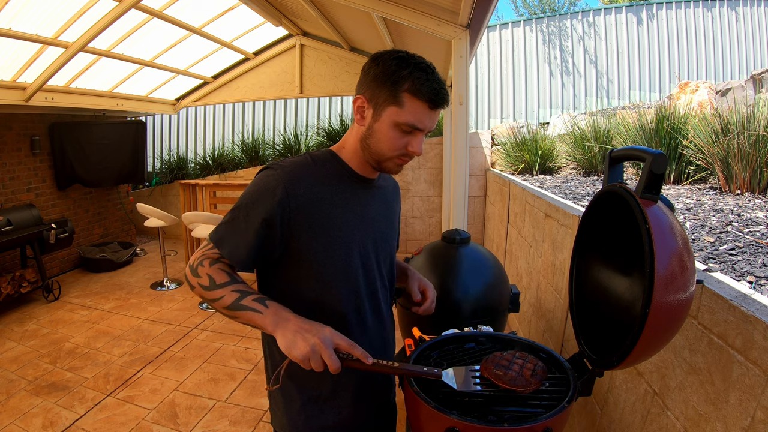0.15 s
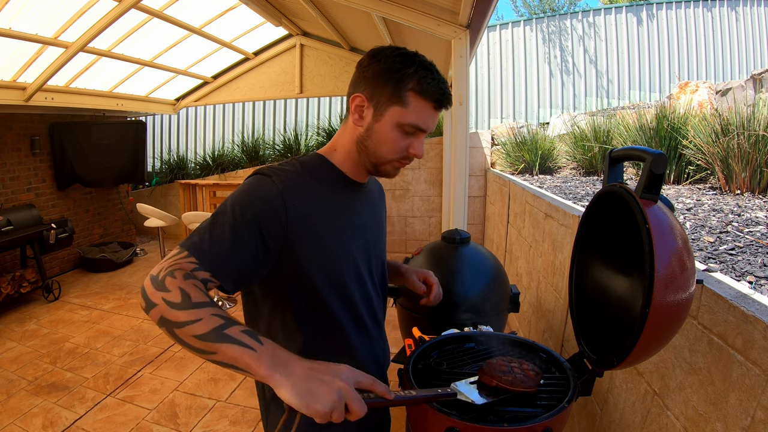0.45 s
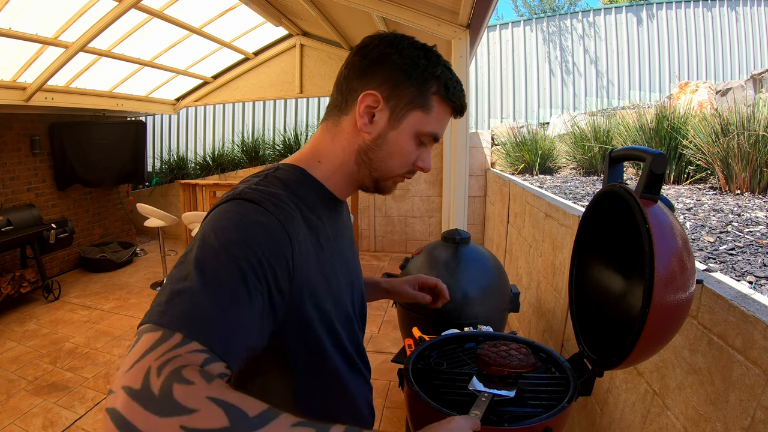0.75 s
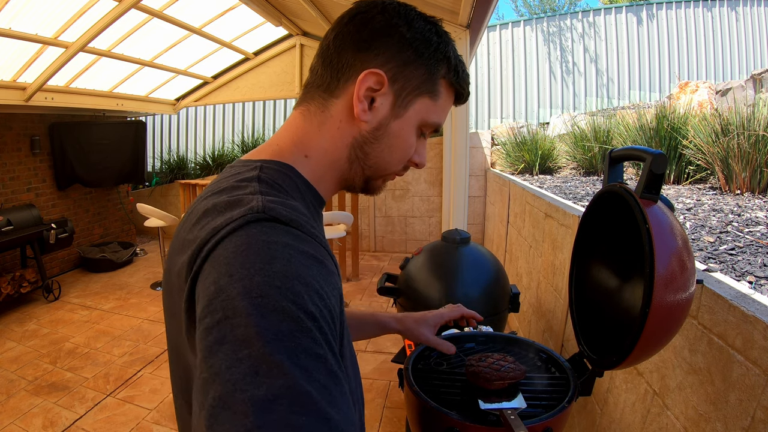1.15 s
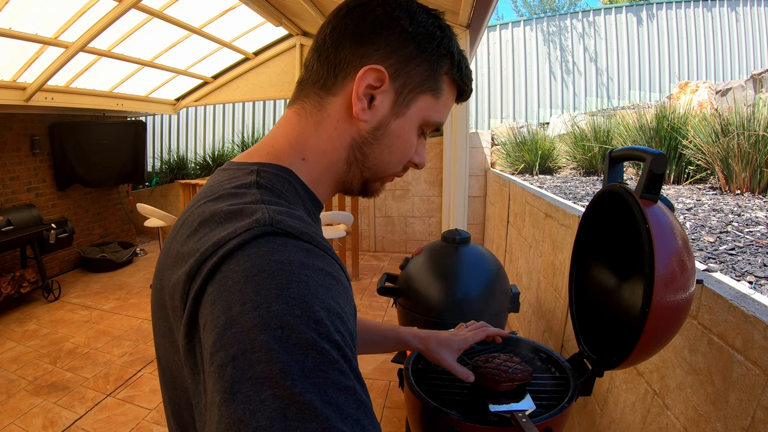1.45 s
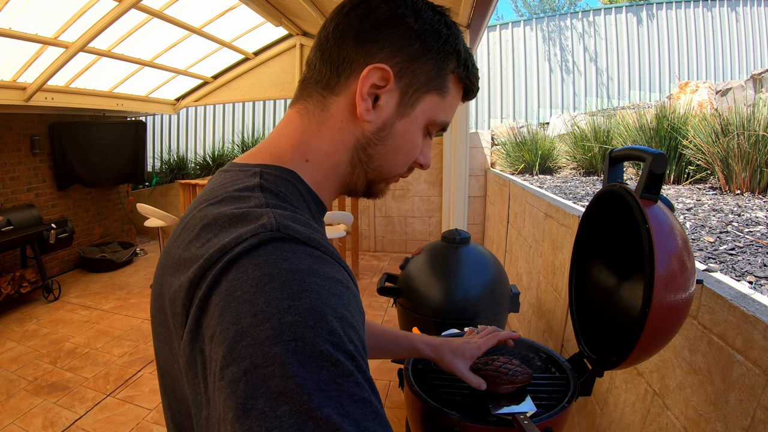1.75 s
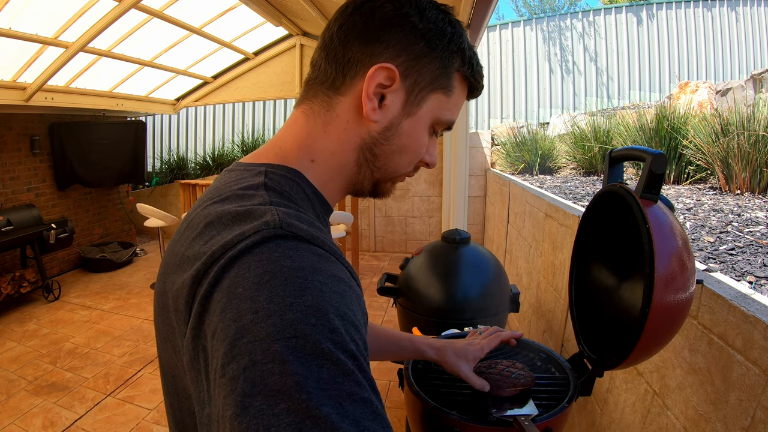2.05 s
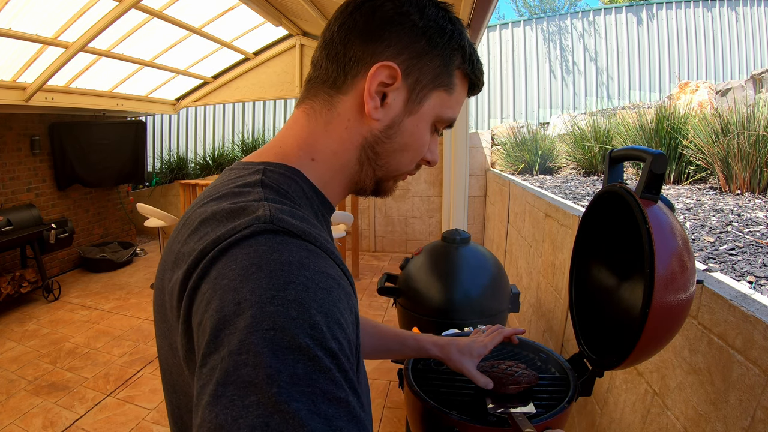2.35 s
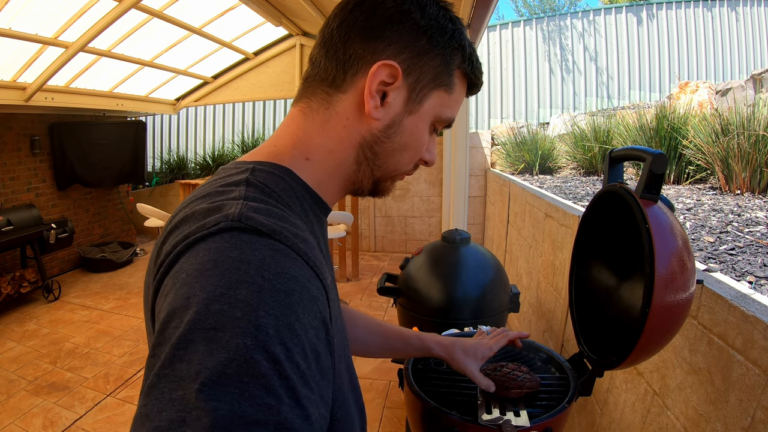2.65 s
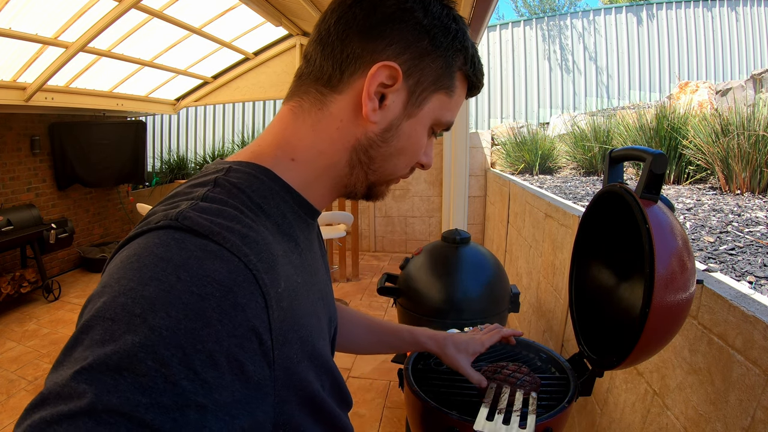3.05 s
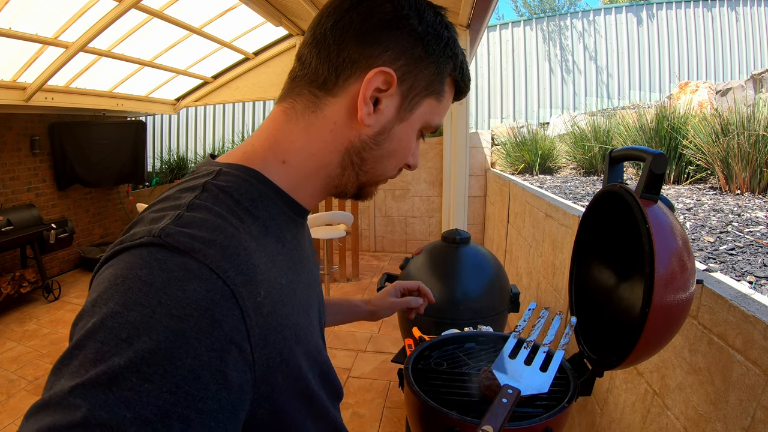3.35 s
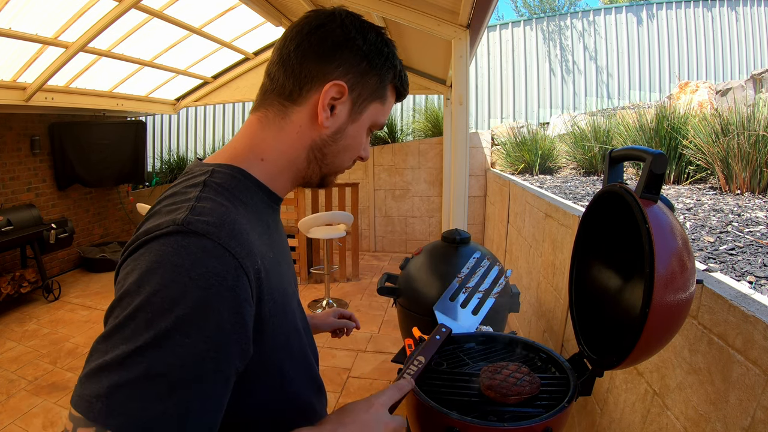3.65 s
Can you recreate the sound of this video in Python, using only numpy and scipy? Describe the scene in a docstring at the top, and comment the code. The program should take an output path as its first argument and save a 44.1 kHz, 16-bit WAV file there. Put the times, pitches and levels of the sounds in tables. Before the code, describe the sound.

A steak sizzles and crackles close up on an outdoor grill, with small fat pops; it quietens, a steel spatula scrapes and clinks on the grate, then the sizzle surges, dense and loud. Close stereo microphones.

```python
"""Under a patio roof, a steak sizzles on a kettle grill: a crackle of thousands of tiny bubble clicks.
Pockets of juice sputter (runs of ringing clicks), steam sings (narrow sliding hisses) and fat pops.
The cook shuffles about (soft noise scuffs and knocks) and works a steel spatula under the meat;
it scrapes the grate (tiny slips that ring steel tones). The sizzle surges, in a second and denser
layer of bubbles, as the wet side lands on hot metal. Low outdoor noise lies behind it all."""
import sys
import numpy as np
from scipy import signal
from scipy.fft import rfft, irfft, next_fast_len
from scipy.io import wavfile

SR = 44100
rng = np.random.default_rng(int(sys.argv[2]) if len(sys.argv) > 2 else 0)


def master_out(mix):
    """Clip the mix to full scale and print it as 16-bit PCM to the path in sys.argv[1]."""
    frames = np.transpose(np.atleast_2d(mix))
    ceiling = np.clip(frames, -1, 1)
    pcm = np.round(ceiling * 32767).astype(np.int16)
    wavfile.write(sys.argv[1], SR, pcm)


N = 167580
SIZE = next_fast_len(N + SR // 8, True)  # padded length for filtering
T, HZ = np.arange(N) / SR, np.fft.rfftfreq(SIZE, 1 / SR)

# outdoor background, relative loudness by pitch: pitch_hz, level_db
AIR_COLOUR = [(20, -17), (40, -11), (70, -14), (105, -27), (140, -0.5), (190, -0.5), (290, -4.5),
              (420, -18.5), (750, -7), (1500, -9.5), (5000, -26.5), (15000, -49)]
AIR_DB = -71
# a puff of air on the microphone: start_s, length_s, level_db
AIR_PUFF = (1.455, .09, -61)

# dull knocks and rumbles of handling: start_s, length_s, level_db, pitch_hz
HANDLING_KNOCKS = [(0.625, 0.061, -60.5, 277), (0.783, 0.046, -67, 193), (1.433, 0.076, -59, 510),
                   (1.442, 0.054, -63.5, 320), (1.51, 0.16, -66, 262), (2.244, 0.25, -70.5, 207),
                   (2.438, 0.1, -70.5, 414), (2.716, 0.052, -64.5, 290), (2.944, 0.047, -57.5, 250),
                   (3.077, 0.14, -56, 252), (3.278, 0.16, -62, 280), (3.443, 0.25, -67, 237)]
KNOCK_WIDTH = 0.4  # share of its pitch

# soft scuffs and bumps as the cook moves: start_s, length_s, level_db, thump_level_db
COOK_SCUFFS = [(0.594, 0.082, -52.5, -60.5), (1.414, 0.09, -55.5, -63), (2.173, 0.086, -54, -64),
               (2.525, 0.052, -57.5, -77), (2.896, 0.13, -49, -60), (3.10, 0.11, -67, -62)]
SCUFF_RISE_S = .012
# relative loudness of the gritty rub: pitch_hz, level_db
GRIT_COLOUR = [(100, -31), (250, -1.5), (400, -6), (540, -4.5), (800, 0.5), (1100, -0.5), (1900, 1.5),
               (5000, -41), (12000, -67)]
# relative loudness of the dull thump: pitch_hz, level_db
DULL_COLOUR = [(30, -20), (90, -54), (140, 1), (230, 4), (330, -7), (500, -6.5), (2000, -64)]

# the blade nudges the grate: start_s, length_s, level_db
GRATE_NUDGES = [(2.549, 0.023, -58), (2.586, 0.016, -64)]
# tones at which the grate rings: pitch_hz, level_db, time_to_fade_60_db_s
GRATE_TONES = [(394, -3, 0.17), (730, -16, .09), (850, -1, .09), (1038, 2.5, 0.053), (1184, -4, 0.042)]

# spatula scraping the grate: start_s, length_s, level_db, rasp_pitch_hz
BLADE_SCRAPES = [(2.535, 0.0097, -43, 4330), (2.540, 0.0042, -43, 7000), (2.606, 0.031, -48, 6440),
                 (2.622, 0.025, -60, 3340), (2.707, 0.07, -49.5, 2100), (2.817, 0.026, -47, 4550),
                 (2.897, 0.013, -25.5, 6130)]
RASP_OCTAVES, RASP_DB = 0.53, 0.5  # spread in pitch; level against the ring
# sharp ticks as the blade catches on a bar: start_s, level_db
BLADE_TICKS = [(2.6192, -30), (2.6305, -44), (2.644, -38)]
TICK_DECAY_S, TICK_RING_DB = .0008, -30
# tones at which the steel rings: pitch_hz, level_db, time_to_fade_60_db_s
STEEL_TONES = [(2100, -21, .05), (2420, 3.5, 0.058), (3200, 9, 0.068), (4030, -28, 0.028),
               (4700, -9, 0.026), (5240, -9, 0.023), (6490, -4, .035), (6820, 6.5, 0.023),
               (7200, -5, 0.051), (9850, 1, .03)]

# single pops of fat: start_s, level_db, pitch_hz
FAT_POPS = [(0.344, -28, 5400), (0.875, -24, 3960), (1.951, -31, 3760), (1.992, -34, 3760),
            (2.020, -29.5, 5540), (2.421, -37, 4020)]
POP_DECAY_S, POP_GRIT, POP_ROOM_DB = 0.00067, 0.17, -5  # grit is a share of the tone

# narrow, singing hisses of escaping steam: start_s, length_s, level_db, first_pitch_hz, last_pitch_hz
STEAM_JETS = [(0.117, 0.088, -48.5, 5100, 4900), (0.446, 0.078, -49.5, 2770, 2580),
              (0.552, 0.11, -51, 2210, 2070), (0.708, 0.18, -48, 5360, 5260),
              (1.16, 0.21, -50.5, 6600, 6870), (1.945, 0.095, -48, 3894, 3770),
              (2.091, 0.3, -59, 3740, 3790), (2.33, 0.15, -62.5, 3840, 3890),
              (2.542, 0.023, -43.5, 3034, 3100), (2.578, 0.129, -53.5, 3100, 3020),
              (2.683, 0.1, -57, 2390, 2400), (2.709, 0.105, -56.5, 3080, 3050),
              (2.823, 0.032, -43.5, 4500, 4430), (3.412, 0.026, -42, 2257, 2280),
              (3.6, 0.03, -37, 3340, 3340), (3.646, 0.038, -38, 2810, 2700)]
JET_WIDTH_HZ = 270

# pockets of juice that sputter: start_s, length_s, level_db, pitch_hz
JUICE_SPUTTERS = [(0.037, 0.056, -41, 3900), (0.067, 0.16, -47.5, 4550), (0.793, 0.15, -46, 3900),
                  (0.865, 0.067, -40.5, 3820), (1.013, .13, -50.5, 3160), (1.075, 0.11, -46.5, 4500),
                  (1.505, 0.097, -48, 3450), (1.97, 0.13, -52, 3400), (3.145, 0.27, -38.5, 3720)]
SPUTTER_WIDTH, SPUTTERS_PER_S = 0.2, 1100  # width is a share of its pitch

CLUMP_WIDTH = 0.29  # one family of bubble sizes, share of its pitch
SPLIT_LOW_HZ, SPLIT_HIGH_HZ = 2585, 5560  # low mids | upper mids | treble
# resting sizzle over time: time_s, low_mids_db, upper_mids_db, treble_db
RESTING_LEVELS = [(0, -58, -47.5, -54), (.12, -57, -54, -46.5), (.22, -55.5, -50, -50.5),
                  (.5, -52.5, -52, -45), (.62, -56, -47.5, -47.5), (.76, -57.5, -47.5, -50),
                  (.9, -55.5, -46, -47), (1.17, -54.5, -47, -47), (1.5, -55, -47, -51.5),
                  (1.7, -58.5, -49.5, -52), (1.89, -63, -53.5, -60), (1.98, -55.5, -58, -60.5),
                  (2.17, -62, -55, -65.5), (2.35, -65.5, -59, -64), (2.52, -61.5, -59, -64.5),
                  (2.63, -56, -62, -59.5), (2.72, -60, -61, -66)]
# relative loudness of the resting sizzle: pitch_hz, level_db
RESTING_TONE = [(300, -16.5), (450, -25), (600, -21), (738, -13), (886, -27.5), (1060, -9.5), (1200, -15.5),
                (1520, -3), (1850, -8.5), (2120, -5.5), (2400, -8), (2900, -6), (3200, -1), (4000, 1),
                (4800, -4.5), (5400, -3), (6400, -6), (8500, -6.5), (10000, -13.5), (11200, -18),
                (13500, -21.5), (15500, -34)]
# the sizzle thins out as the underside dries, change of colour: pitch_hz, level_db
DRY_TONE = [(1000, -5), (1500, -3), (2100, 3.5), (3700, 3.5), (4500, -2), (5300, 2.5), (5900, -1),
            (6900, 3), (7800, 7), (8800, 10.5), (9800, 8), (11000, 6.5), (15000, 9)]
# when the dry colour takes over: time_s, share_0_to_1
DRYING_SHARE = [(1.7, 0), (2.0, 1)]
# surge of the turned steak over time: time_s, low_mids_db, upper_mids_db, treble_db
SURGE_LEVELS = [(2.6, -100, -100, -100), (2.78, -72, -61, -52.5), (2.84, -48, -47, -45.5),
                (2.89, -44.5, -40.5, -41), (2.93, -41.5, -34.5, -36.5), (3.03, -38, -32.5, -32.5),
                (3.19, -39.5, -32.5, -33), (3.4, -40, -33.5, -34), (3.63, -40.5, -36, -34),
                (3.8, -45.5, -37.5, -37.5)]
# relative loudness of the surge: pitch_hz, level_db
SURGE_TONE = [(190, -16), (330, -25), (448, -25.5), (618, -14), (760, -14), (881, -26.5), (1070, -9),
              (1230, -21), (1400, -13), (1600, -7.5), (1850, -12.5), (2220, -3), (2430, -7.5), (2780, -2.5),
              (3100, -6.5), (3650, -1.5), (4150, -6), (4750, -4), (5270, -6), (6290, -4), (6930, -6.5),
              (7900, -2.5), (9500, -11.5), (11200, -16), (13600, -21.5), (15500, -31)]

# how alike the two microphones hear: pitch_hz, likeness_0_to_1
MIC_LIKENESS = [(40, .3), (200, 0.99), (800, 0.37), (1350, 0.5), (2300, 0.82), (3700, 1), (6000, 0.34),
                (7500, 1), (10000, 0.053), (15000, 0.21)]
# how much louder the left is than the right: pitch_hz, left_minus_right_db
MIC_TILT = [(60, -11), (92, 10), (140, 0), (210, -0.5), (330, 0.5), (500, -2.5), (770, -0.5), (1170, -7),
            (1790, -2), (2740, -3.5), (4190, -2), (6410, 0), (9810, -3), (15000, -2)]
# how far the left leads the right: pitch_hz, lead_radians
MIC_LEAD = [(100, 1), (1000, 0.5), (1450, 1.7), (2100, 0.54), (3700, 0.5), (5400, -0.5), (7400, -1.5),
            (8400, -2), (9600, 0), (11500, 3), (15000, 1.5)]
# reflections: time to fade by 60 dB, level against the direct sound
BOWL_T60_S, BOWL_DB = .03, -13
PATIO_T60_S, PATIO_DB = .22, -14
EDGE_HZ = 15750  # top of the sound


def amp(db):
    """Turns decibels into a gain."""
    return 10 ** (np.asarray(db) / 20)


def unit(x):
    """Scales a sound to rms 1."""
    return x / np.sqrt(np.mean(x ** 2) + 1e-20)


def read(points):
    """Reads a table along log frequency, at every frequency bin."""
    f, value = np.transpose(points)
    return np.interp(np.log(HZ + 1), np.log(f + 1), value)


def shape(x, gain):
    """Filters a sound by one gain for each frequency bin."""
    return irfft(rfft(x, SIZE) * gain, SIZE)[..., :N]


def band(hz, width):
    """A resonance around one pitch; width is a share of that pitch."""
    return 1 / (1 + ((HZ - hz) / (hz * width / 2)) ** 2)


def noise_in(gain):
    """Plain noise coloured by a gain for each frequency bin, rms 1."""
    return unit(shape(rng.standard_normal(N), gain))


def drift(hz):
    """A random wander, mostly slower than hz, rms 1."""
    return noise_in(1 / (1 + (HZ / hz) ** 4))


def clicks(per_s, spread_db):
    """Clicks at random times; a positive spread makes a few stand out, a negative one makes a few faint."""
    size = amp(spread_db * np.minimum(rng.exponential(1, N), 4.5))
    return size * rng.choice([-1, 1], N) * (rng.random(N) < per_s / SR)


def burst(start, length, rise, release):
    """Rises in seconds, holds to half the length, then fades; release is a share of the length."""
    attack = np.clip((T - start) / rise, 0, 1)
    return attack * np.exp(-np.maximum(T - start - length / 2, 0) / (release * length))


def patchy(x, depth_db, width_hz, length_s):
    """The colour wanders at random, in patches across pitch and time; overall loudness stays."""
    f, t, z = signal.stft(x, SR, nperseg=1024, noverlap=768)
    across = np.fft.fftfreq(len(f), f[1])[:, None]
    along = np.fft.fftfreq(len(t), t[1])
    blur = np.exp(-(across * width_hz) ** 2 - (along * length_s) ** 2)
    field = unit(np.fft.ifft2(np.fft.fft2(rng.standard_normal(z.shape)) * blur).real)
    varied = signal.istft(z * amp(depth_db * field), SR, nperseg=1024, noverlap=768)[1][:N]
    return unit(varied) * np.std(x)


def air():
    """Low outdoor noise that swells at random, and one low puff of wind."""
    s, length, db = AIR_PUFF
    puff = amp(db) * burst(s, length, 0.0099, 0.18) * noise_in(band(34, 0.65))
    swell_db = 2 * drift(8)
    return puff + amp(AIR_DB + swell_db) * noise_in(amp(read(AIR_COLOUR)))


def knocks():
    """Low, short rumbles as the grill is handled: noise around one pitch each."""
    out = np.zeros(N)
    for s, length, db, hz in HANDLING_KNOCKS:
        out += amp(db) * burst(s, length, 0.0035, 0.45) * noise_in(band(hz, KNOCK_WIDTH))
    return out


def scuffs():
    """Gritty rubs of many clicks that swell unevenly and break up, each with a dull thump."""
    out = np.zeros(N)
    for s, length, db, thump_db in COOK_SCUFFS:
        grit = unit(shape(clicks(3500, spread_db=.6), amp(read(GRIT_COLOUR))))
        thump = noise_in(amp(read(DULL_COLOUR)))
        out += burst(s, length, SCUFF_RISE_S, 0.9) * (amp(db) * grit + amp(thump_db) * thump)
    uneven = out * amp(.7 * drift(90))
    return patchy(uneven, depth_db=3, width_hz=110, length_s=.035)


def grate():
    """The blade nudges the grate, which rattles in its seat: small clicks ring its tones."""
    t, out = T[:SR // 2], np.zeros(N)
    for s, length, db in GRATE_NUDGES:
        for hz, tone_db, t60 in GRATE_TONES:
            rattle = clicks(1500, spread_db=-3) * burst(s, length, .003, 0.59)
            tone = amp(-60 * t / t60) * np.sin(2 * np.pi * hz * t)
            ring = signal.fftconvolve(rattle, tone)[:N]
            # the root sets the level over the nudge, not over the whole scene
            out += amp(db + tone_db) * np.sqrt(length / T[-1]) * unit(ring)
    return out


def spatula():
    """Tiny slips of steel on steel ring fading tones; catches on a bar add short noise ticks."""
    t = T[:SR // 4]
    ring = sum(amp(db - 60 * t / t60) * np.sin(2 * np.pi * hz * t) for hz, db, t60 in STEEL_TONES)
    out = np.zeros(N)
    for s, length, db, hz in BLADE_SCRAPES:
        slips = clicks(2200, spread_db=2.0) * burst(s, length, 0.0027, 1.0)
        slips = shape(slips, np.exp(-.5 * (np.log2((HZ + 1) / hz) / RASP_OCTAVES) ** 2))
        ringing = unit(signal.fftconvolve(slips, ring)[:N])
        scrape = unit(ringing + amp(RASP_DB) * unit(slips))
        out += amp(db) * np.sqrt(length / T[-1]) * scrape
    for s, db in BLADE_TICKS:
        snap = rng.standard_normal(len(t)) * np.exp(-t / TICK_DECAY_S)
        tick = shape(snap, 2 * band(5600, .8) ** 2)[:len(t)]
        out[round(s * SR):][:len(t)] += amp(db) * (tick + amp(TICK_RING_DB) * ring)
    return out


def pops():
    """Single large bubbles: a few cycles of a gritty tone, with a short noisy ring of the bowl."""
    out, t = np.zeros((2, N)), T[:SR // 25]
    for s, db, hz in FAT_POPS:
        fade = amp(POP_ROOM_DB - 60 * t / BOWL_T60_S) * np.sqrt(POP_DECAY_S / BOWL_T60_S)
        bowl = rng.standard_normal((2, len(t))) * fade
        tone = np.sin(2 * np.pi * hz * t) + POP_GRIT * rng.standard_normal(len(t))
        at = round(s * SR)
        out[:, at:at + len(t)] += amp(db) * (np.exp(-t / POP_DECAY_S) * tone + bowl)
    # softens the lows and the highest treble
    return shape(out, 1 / (1 + (1800 / (HZ + 1)) ** 4) / (1 + (HZ / 9000) ** 4))


def jets():
    """Steam sings through small gaps; the pitch slides as the gap changes."""
    out = np.zeros(N)
    for s, length, db, first_hz, last_hz in STEAM_JETS:
        turns = np.cumsum(np.interp(T, [s, s + length], [first_hz, last_hz])) / SR
        # a random wobble widens the pure tone into a narrow hiss
        wobble = drift(JET_WIDTH_HZ / 2) + 1j * drift(JET_WIDTH_HZ / 2)
        hiss = (wobble * np.exp(2j * np.pi * turns)).real
        out += amp(db) * burst(s, length, 0.0085, 0.34) * hiss
    return out


def sputters():
    """Quick runs of bubbles ring one small pocket each."""
    out = np.zeros(N)
    for s, length, db, hz in JUICE_SPUTTERS:
        run = unit(shape(clicks(SPUTTERS_PER_S, spread_db=-1.8), band(hz, SPUTTER_WIDTH)))
        out += amp(db) * burst(s, length, 0.01, 0.57) * run
    return out


def sizzle(levels, colour, per_s, spread_db, snap_db, steam_db, patchy_db, flutter_db):
    """Bubbles of many sizes burst in clumps, with sharp snaps and a hiss of steam."""
    bubbles = np.zeros(N)
    for hz in np.geomspace(900, 15000, num=14):
        family = unit(shape(clicks(per_s * hz / SR, spread_db), band(hz, CLUMP_WIDTH)))
        bubbles += family * np.sqrt(hz) * amp(patchy_db * drift(10.4))
    snaps = amp(snap_db) * unit(clicks(per_s, spread_db))
    steam = amp(steam_db) * rng.standard_normal(N)
    fizz = (unit(bubbles) + snaps + steam) * amp(flutter_db * drift(30))
    fizz = shape(fizz, amp(read(colour)) / (1 + (280 / (HZ + 1)) ** 4))
    # three bands, each following its own level over time
    low = 1 / (1 + (HZ / SPLIT_LOW_HZ) ** 8)
    high = 1 - 1 / (1 + (HZ / SPLIT_HIGH_HZ) ** 8)
    s, *curves = np.transpose(levels)
    parts = zip([low, 1 - low - high, high], curves)
    return sum(unit(shape(fizz, part)) * amp(np.interp(T, s, db)) for part, db in parts)


def drying(x):
    """As the underside dries, the hiss blends from full to thin."""
    share = np.interp(T, *np.transpose(DRYING_SHARE))
    return (1 - share) * x + share * shape(x, amp(read(DRY_TONE)))


def resting():
    """The crackle of bubbles under the steak lying on the grate."""
    fizz = amp(0.5) * sizzle(RESTING_LEVELS, RESTING_TONE, per_s=6000, spread_db=2.0, snap_db=-1.0,
                             steam_db=-2.0, patchy_db=2.3, flutter_db=0.68)
    return patchy(fizz, depth_db=2.3, width_hz=260, length_s=.16)


def surge():
    """Fresh juice meets hot metal; the large, low bubbles come in fits."""
    fizz = sizzle(SURGE_LEVELS, SURGE_TONE, per_s=9500, spread_db=2.8, snap_db=0,
                  steam_db=-5, patchy_db=.9, flutter_db=0.25)
    body = shape(fizz, 1 / (1 + (HZ / 1400) ** 8))
    broken = patchy(body, depth_db=3.2, width_hz=130, length_s=.07)
    return broken + patchy(fizz - body, depth_db=2.0, width_hz=110, length_s=.09)


def place(source):
    """Two close microphones share part of a source; the grill bowl and the patio add reflections."""
    t = T[:SR // 2]
    echoes = np.zeros((2, len(t)))
    for db, t60 in [(BOWL_DB, BOWL_T60_S), (PATIO_DB, PATIO_T60_S)]:
        tail = rng.standard_normal((2, len(t))) * amp(-60 * t / t60) * (t > .001)
        echoes += amp(db) * unit(tail) / np.sqrt(len(t))
    echoes[:, 0] += 1  # the direct sound
    echoes /= np.linalg.norm(echoes, axis=1, keepdims=True)
    # two separate takes of chance: one heard alike by both sides, one heard opposite
    pair = np.array([source(), source()])
    common, apart = rfft(signal.fftconvolve(pair, echoes, axes=1)[:, :N], SIZE)
    likeness = np.clip(read(MIC_LIKENESS), 0, .99)
    common = common * np.sqrt((1 + likeness) / 2)
    apart = apart * np.sqrt((1 - likeness) / 2)
    # each side takes half of the tilt and half of the lead
    lean = amp(read(MIC_TILT) / 2) * np.exp(.5j * read(MIC_LEAD))
    return irfft([(common + apart) * lean, (common - apart) / lean], SIZE)[:, :N]


def grill():
    """All the sources at the grill except the pops, in one channel."""
    handling = knocks() + scuffs() + grate() + spatula()
    return air() + handling + jets() + sputters() + drying(resting()) + surge()


def scene():
    """The grill in its space, plus the pops with their own bowl ring."""
    return place(grill) + pops()


def record(dry):
    """Cuts off the treble above the top edge."""
    edge = signal.firwin(511, EDGE_HZ, window=("kaiser", 9), fs=SR)
    return signal.oaconvolve(dry, edge[None], "same")


dry = scene()
out = record(dry)
master_out(out)
```